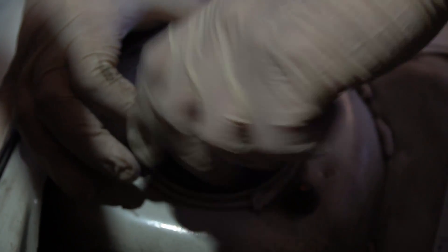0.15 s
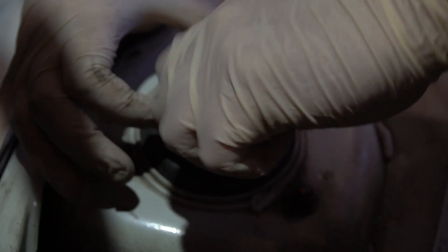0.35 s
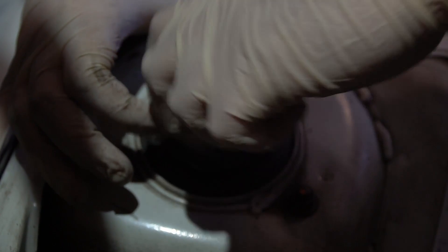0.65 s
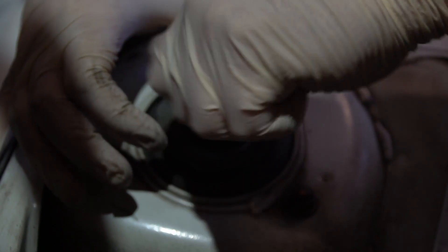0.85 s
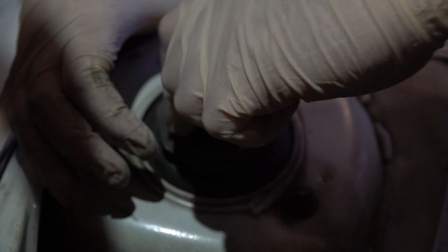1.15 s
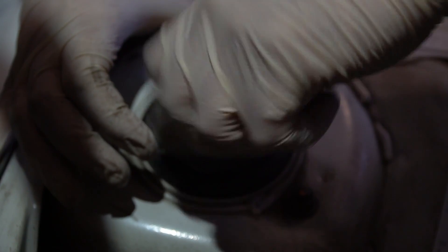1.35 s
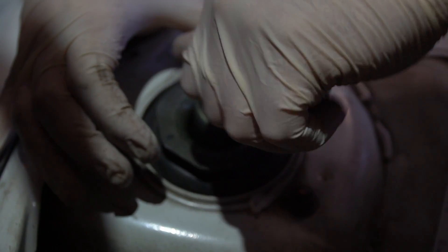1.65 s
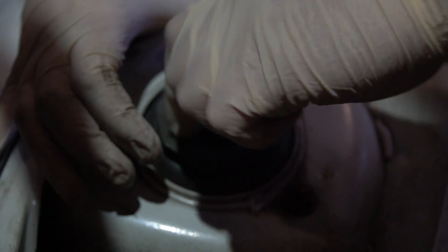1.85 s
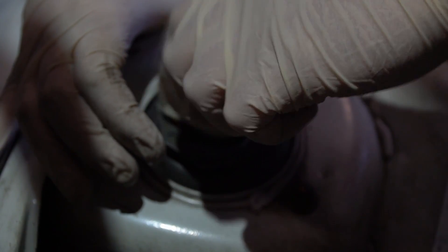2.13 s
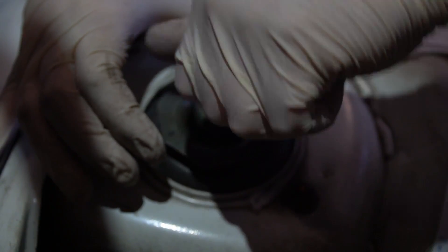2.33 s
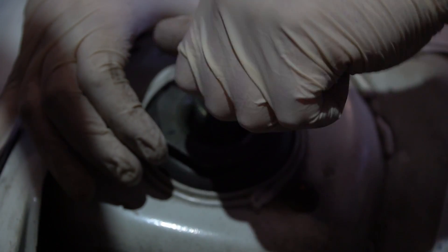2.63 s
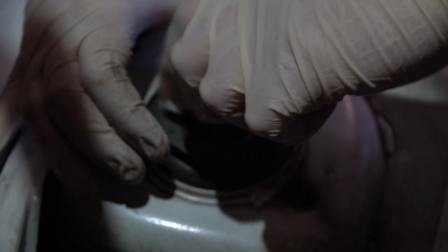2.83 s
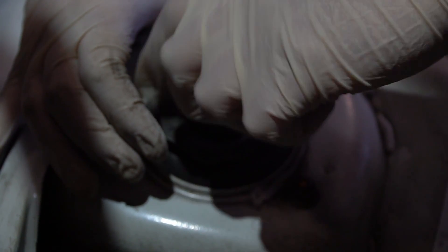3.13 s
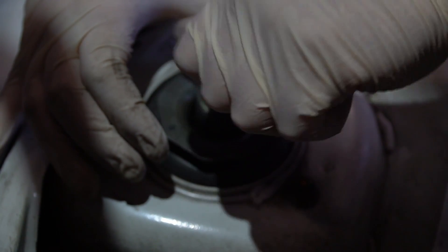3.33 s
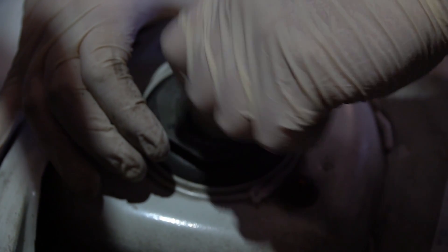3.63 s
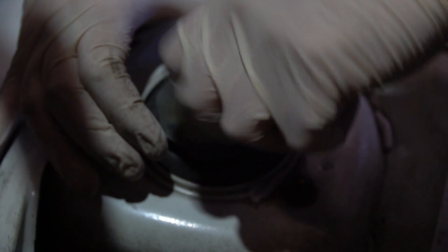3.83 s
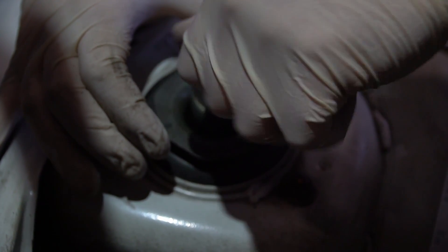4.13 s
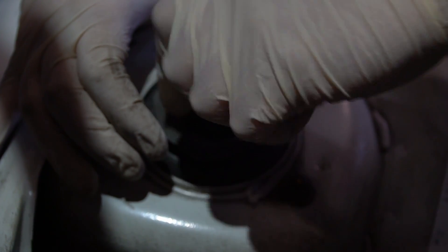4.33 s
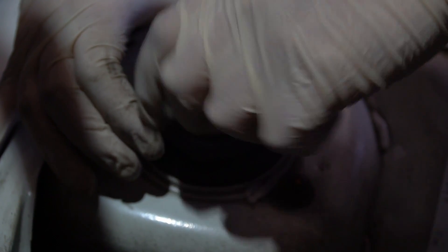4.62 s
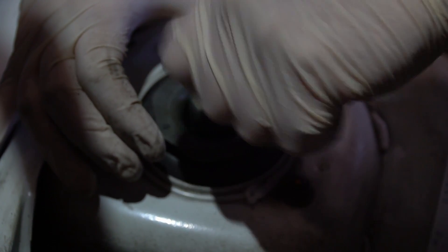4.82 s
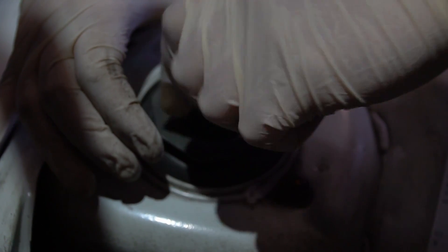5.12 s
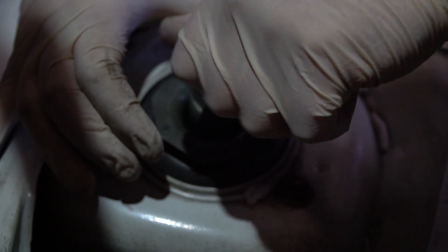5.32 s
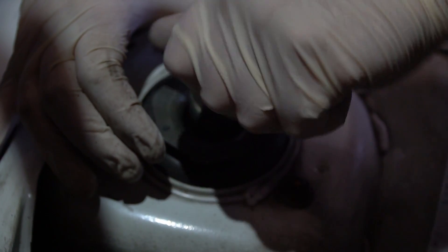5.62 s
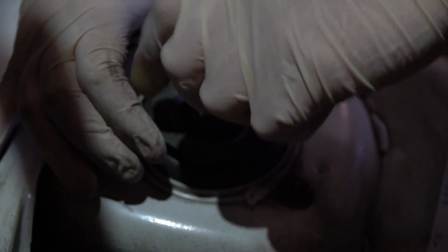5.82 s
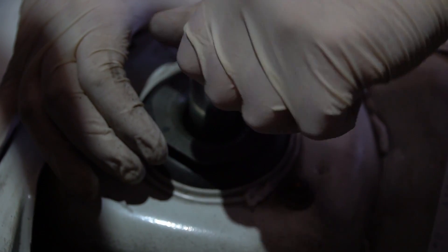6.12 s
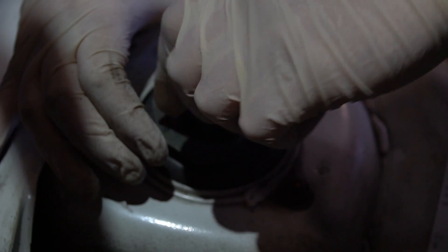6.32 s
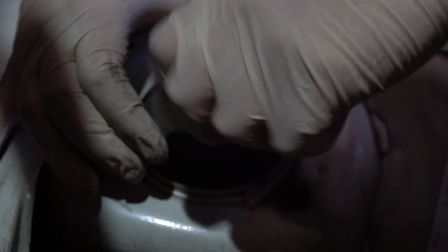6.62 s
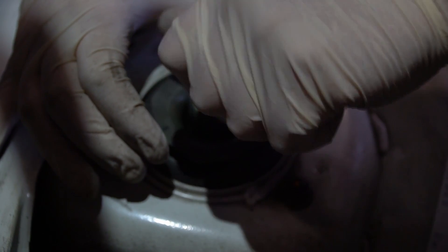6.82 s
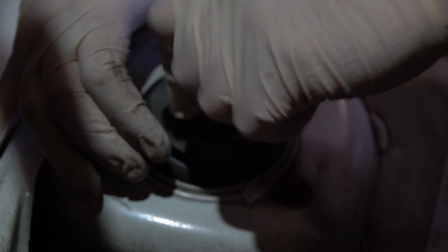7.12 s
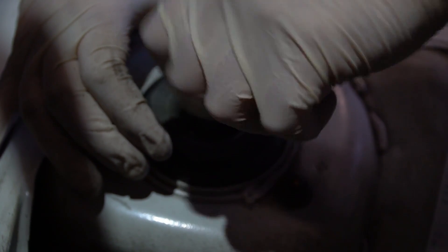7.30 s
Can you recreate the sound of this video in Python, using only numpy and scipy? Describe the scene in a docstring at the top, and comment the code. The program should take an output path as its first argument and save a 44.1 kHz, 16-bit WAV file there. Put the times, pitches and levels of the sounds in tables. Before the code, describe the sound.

Steady hand work in a garage, miked close in stereo: fingers slide and tick on a metal nut and plate, two or three small contacts a push, with short woody-low notes from the rod. The ring is brief and the room nearly dry. A muffled engine drones outside, rising, falling in pitch midway and rising again, with swelling low rumble and faint hiss.

```python
"""In a garage, a gloved hand spins a nut off a strut rod, a part turn at a time.
Each push is noise slips in the threads ringing the strut's low modes, with a faint rod tone and short low notes.
Fingers slide and tick on the metal: grains and noise bursts, coloured spot by spot, ring the nut and mount plate.
An engine hums beyond the walls, a few sine lines that climb, drop as if changing gear and climb again.
Shaped noise makes the garage's swelling rumble and soft hiss."""
import sys
import numpy as np
from scipy import signal
from scipy.fft import rfft, irfft
from scipy.io import wavfile
from scipy.ndimage import uniform_filter1d

SR = 44100
rng = np.random.default_rng(int(sys.argv[2]) if len(sys.argv) > 2 else 0)


def to_wav(s):
    """Save 16-bit WAV."""
    ch = np.atleast_2d(s).T  # columns
    pcm = np.round(np.clip(ch, -1, 1) * 32767)  # PCM
    wavfile.write(sys.argv[1], SR, pcm.astype(np.int16))


N = 328986

# Levels are those of each source before its own trim, the metal's ring, the room and the mix.
# Engine course: start_s, firing_hz, level_db (rms)
ENGINE_COURSE = [(0.0, 86.4, -29.5), (0.37, 87.4, -28.5), (0.65, 89.35, -32.5), (1.58, 91.7, -26),
                 (2.29, 93.5, -29), (2.41, 94.2, -34), (3.05, 95.7, -32), (3.09, 96, -36.5),
                 (3.6, 95.6, -34.5), (3.83, 90.5, -26.5), (4.09, 76.8, -41.5), (4.22, 74.6, -45),
                 (4.77, 75.6, -45.5), (5.63, 78.4, -37), (5.83, 78.8, -41), (7.35, 81.0, -36)]
# Weaker engine lines: multiple of the firing rate, before_db (rms before the gear change),
# after_db (level that the lines move 0.38 of the way towards)
CRANK_ORDERS = [(0.602, -54, -67), (1.2, -48.5, -47), (1.399, -62, -44), (1.598, -59, -48)]
# Spectrum of the garage background: freq_hz, density_db (per Hz, relative)
AIR_SPECTRUM = [(20, -21), (33, -3.5), (45, -5.5), (65, -1), (90, 5.5), (115, -1.5), (150, -1.5),
                (175, -11), (330, -15.5), (600, -19.5), (1500, -23), (4000, -29.5), (8000, -33),
                (16000, -43)]
# Left-right likeness of the background: freq_hz, likeness (0 to 1)
AIR_LIKENESS = [(100, 1), (250, 0.99), (500, 0.52), (2000, 0.49), (5000, 0.12), (16000, 0.13)]
# Swells of the distant rumble: time_s, gain_db
RUMBLE_SWELLS = [(0, -5), (1.5, 3.5), (3, -4), (4.5, 0.5), (6, -2.5), (7.4, 0)]
# Pushes of the hand on the nut: peak_s (hardest moment), build_up_s, run_out_s, force_db
PUSHES = [(0.455, .13, 0.11, -41), (0.88, 0.088, .12, -36.5), (1.31, 0.22, 0.09, -39),
          (1.59, 0.1, 0.07, -32.5), (1.93, .13, 0.1, -36.5), (2.24, 0.069, .16, -35.5),
          (2.495, 0.051, 0.12, -38.5), (2.875, 0.044, .1, -44.5), (3.13, .03, 0.059, -39),
          (3.235, 0.023, 0.084, -43), (3.339, 0.061, 0.068, -31.5), (3.485, .04, 0.077, -45.5),
          (3.715, 0.062, 0.09, -33.5), (4.06, 0.15, 0.21, -45), (4.436, 0.037, 0.082, -34.5),
          (4.87, 0.057, .06, -31.5), (4.925, .04, 0.094, -42), (5.19, 0.044, 0.058, -39.5),
          (5.25, .04, 0.1, -41), (5.61, 0.14, 0.18, -40.5), (5.96, 0.23, 0.063, -47),
          (6.05, 0.082, 0.11, -39), (6.13, 0.045, 0.1, -41), (6.46, .11, 0.077, -35),
          (6.615, 0.033, .07, -43), (6.795, .1, .12, -34.5), (6.985, .04, 0.051, -45.5),
          (7.12, .04, .14, -42), (7.29, 0.13, 0.12, -37)]
# Low modes of the strut: pitch_hz, width_hz, level_db (relative)
STRUT_MODES = [(212, 11.5, 3.5), (250, 62, -3), (305.3, 26, 4), (348.1, 16.2, 5.5), (386, 18, -9),
               (500.4, 11.6, -4), (542, 26, -10), (610, 60, -20), (735, 50, -23), (930, 110, -18.5)]
# Fingers sliding over the metal: middle_s, length_s, level_db, clank_db (up to 1.7 kHz), fizz_db (from 8.5 kHz);
# clank and fizz are relative to 2.6-4.3 kHz
FINGER_SLIDES = [(0.125, 0.066, -41.5, -0.5, -2), (0.259, 0.012, -39, -2, 0), (0.56, 0.046, -44.5, 1.5, -6),
                 (0.62, 0.036, -36.5, -3, -6.5), (0.676, 0.016, -30.5, 3, -3),
                 (0.882, 0.017, -35.5, -1.5, -6), (0.968, 0.025, -33, -5.5, -4),
                 (1.025, .035, -39.5, 1.5, -3.5), (1.069, 0.019, -28, 4, -4), (1.215, 0.021, -40, 1, -6),
                 (1.257, .02, -52, 10, -14), (1.31, 0.11, -45, -2, -4.5), (1.422, 0.033, -40, 6, 4.5),
                 (1.56, 0.049, -48, 5, -5), (1.646, 0.03, -37.5, -3.5, -2.5), (1.724, 0.043, -43, -1.5, 0),
                 (1.94, 0.08, -50, 0, -2), (2.024, 0.022, -38, -4, -4), (2.103, 0.039, -36.5, -2, -1.5),
                 (2.238, 0.017, -39.5, 1.5, -1.5), (2.356, 0.02, -35, -7, -5.5),
                 (2.439, 0.033, -35, -0.5, -5), (2.63, 0.12, -45, 2, -7), (2.693, 0.014, -33.5, -7.5, -6.5),
                 (2.772, 0.035, -38, 0.5, -0.5), (3.01, 0.098, -41, -3, -7),
                 (3.397, 0.053, -39, -3.5, -8.5), (3.519, 0.054, -40.5, 3, -1.5),
                 (3.704, 0.025, -39, 0, -5.5), (3.795, .018, -36, -5.5, -4), (3.843, 0.015, -39, -17, -3.5),
                 (3.886, 0.019, -35.5, -0.5, -2), (4.173, 0.023, -40, -4, -2),
                 (4.272, .036, -38.5, 1.5, -3.5), (4.535, .033, -36, -7, -5), (4.595, .025, -38.5, -0.5, 2),
                 (4.668, 0.018, -31, -5.5, -5), (4.84, 0.043, -46, 4, -3.5), (4.938, 0.036, -38.5, -13, -4),
                 (5.033, 0.028, -39.5, -1, -10), (5.072, 0.017, -33.5, 1, -2), (5.247, 0.013, -42, 5, -21),
                 (5.333, 0.021, -41.5, -4, -4.5), (5.395, .013, -46, 0, 6.5),
                 (5.653, 0.038, -41.5, -3, -14), (5.718, 0.027, -32, -5, -2), (5.769, 0.018, -41, 1, 2),
                 (5.83, 0.026, -42, 1.5, -3), (5.886, 0.0088, -50.5, 7, 13), (6.025, 0.022, -38, 1, -5),
                 (6.135, 0.048, -43, 1.5, -6), (6.286, 0.03, -33.5, 1, -5), (6.44, .04, -47, -2, -10),
                 (6.553, 0.027, -37, -7, -3.5), (6.619, 0.015, -37.5, -1, 0.5), (6.691, 0.031, -36, -2, -5),
                 (6.807, .039, -44.5, -2, -6), (6.912, 0.047, -38.5, -8, -7), (6.975, 0.014, -43, 0, 3),
                 (7.035, 0.0081, -37, -2, -5), (7.169, .025, -38.5, -4, -3), (7.244, 0.044, -43, -3, -2),
                 (7.307, 0.031, -36, 0, -8)]
# Short low notes of the strut: thread catches that make the rod judder, and one low hand bump at 7.098 s:
# start_s, length_s, pitch_hz, level_db (peak)
STRUT_NOTES = [(0.38, .028, 346, -42.5), (0.433, 0.047, 342, -37.5), (0.87, 0.056, 335, -49),
               (1.311, 0.035, 348, -42), (1.548, 0.068, 344, -35), (2.227, 0.0164, 355, -36),
               (2.482, .031, 352, -42), (3.315, 0.04, 332.5, -32.5), (3.699, 0.031, 291.6, -34),
               (4.415, 0.038, 337, -33.5), (4.841, .044, 334.3, -32), (5.241, 0.028, 349, -36.5),
               (5.623, .02, 323, -34.5), (6.029, 0.04, 343, -33.5), (6.113, .026, 353, -37.5),
               (6.312, .035, 339, -40.5), (6.447, 0.033, 338, -36), (6.778, .037, 342, -29),
               (7.098, .067, 152, -35), (7.223, 0.031, 330, -40.5), (7.282, 0.014, 353, -33.5)]
# Sharp ticks of nut and glove: start_s, decay_s, level_db (energy over 1 ms), clank_db, fizz_db (as for the slides)
NUT_TICKS = [(0.443, 0.0074, -33.5, -8, -2.5), (0.562, 0.0038, -29, -3, -2.5), (0.673, 0.0026, -34, -3, 3),
             (1.0618, .0024, -27.5, -3, 5.5), (1.0648, .0024, -19.5, 8, -1.5),
             (1.3396, 0.00076, -34.5, -5, 6), (1.634, 0.003, -19.5, -4, -8), (1.775, 0.0029, -36.5, 5, 5.5),
             (2.132, 0.0015, -30, 10.5, 5.5), (2.347, .002, -40, -7, 11.5), (2.4102, .001, -37, -6, 9),
             (2.591, 0.0044, -24, -10, -6.5), (2.6213, 0.0022, -31.5, -9, 9),
             (3.0572, 0.0033, -20.5, -3, -8), (3.119, 0.0042, -30, 6, 3), (3.305, 0.0085, -21.5, -6, -19),
             (3.423, .0023, -33, -7, 4.5), (3.481, .001, -29.5, -3, 6.5), (3.760, .001, -40, -3, 10),
             (4.036, 0.0022, -47, -5, 12.5), (4.096, 0.0012, -33.5, -9, 3), (4.113, 0.005, -29.5, -9, 7),
             (4.392, 0.0052, -24.5, 3.5, -2), (4.659, 0.0038, -23.5, -4, -2.5),
             (4.817, .005, -28.5, -3, -2), (4.9883, 0.0026, -31.5, -12, 1.5),
             (5.0644, 0.0039, -26.5, 3, -6), (5.205, 0.0035, -26.5, 2.5, -5), (5.564, 0.0024, -23, -12, 1),
             (5.574, 0.0039, -16.5, -5.5, -13.5), (5.9892, 0.0039, -34, 3, 5), (6.187, .002, -26.5, 0, 7),
             (6.197, 0.0044, -28.5, -2, 5), (6.4326, .005, -25.5, -8, 3), (6.479, 0.0028, -38, -4, 8),
             (6.547, .0011, -37, -6, 10), (6.785, 0.0028, -30, 2, 2), (7.211, 0.00099, -30, -8, 12),
             (7.257, .0007, -26.5, -13, 10), (7.3525, .002, -35.5, -2, 7.5)]
# Plain contact noise, before any ring: freq_hz, level_db
CONTACT_TONE = [(200, -17), (500, -14.5), (800, -6), (1500, -5), (2150, -8), (3300, -1.5), (4500, -3),
                (5200, -1.5), (7000, -1), (10000, -0.5), (13000, -2), (16000, -3)]
# Ring of the nut and the mount plate: pitch_hz, width_hz, level_db (over the plain contact noise)
PLATE_MODES = [(1002, 41, 8), (1276, 32, 10), (1858, 150, 9.5), (2387, 135, 9.5), (2690, 67, 5),
               (3104, 29, 9), (3370, 110, 4), (3826, 21, -12), (3965, 74, 7.5), (4380, 120, 3),
               (12500, 55, -16)]
# The hand's work at the right ear against the left: freq_hz, lag_rad, level_db
EAR_OFFSETS = [(199, 0, 1), (600, 0.43, 1), (1800, 0.32, 4), (2440, 0, 0.9), (5100, 1, 1.5), (9600, 1, 0.4),
               (16000, 0.44, 0)]


def amp(db):
    """Decibels to gain."""
    return 10 ** (np.asarray(db) / 20)


def unit(x):
    """Scales to rms 1."""
    return x / np.sqrt(np.mean(x ** 2) + 1e-20)


def read(points, hz):
    """Reads a table on a log-frequency axis."""
    f, value = np.transpose(points)
    return np.interp(np.log(hz + 1), np.log(f + 1), value)


def curve(rows, column=1):
    """One column of a timed table at every sample."""
    rows = np.array(rows)
    return np.interp(np.arange(N) / SR, rows[:, 0], rows[:, column])


def add(mix, s, sound):
    """Mixes a sound in at time s."""
    part = mix[..., max(round(s * SR), 0):][..., :sound.shape[-1]]
    part += sound[..., :part.shape[-1]]


def drift(hz):
    """Random wander of rms 1, low-passed around hz."""
    f = np.fft.rfftfreq(N, 1 / SR)
    noise = rfft(rng.standard_normal(N))
    return unit(irfft(noise / (1 + (f / hz) ** 4), N))


def causal(gain_db, size):
    """Minimum-phase impulse response, sharp at the start, for a gain given as a function of frequency."""
    log_gain = np.log(amp(gain_db(abs(np.fft.fftfreq(size, 1 / SR)))))
    spectrum = np.exp(np.conj(signal.hilbert(log_gain)))
    return np.fft.ifft(spectrum).real[:size // 2]


def peaks(modes, hz):
    """Power response of a set of resonances."""
    return sum(amp(db) ** 2 / (1 + ((hz ** 2 - f ** 2) / (width * hz + 1)) ** 2) for f, width, db in modes)


def slips(per_s, spread_db):
    """Friction: a random train of tiny slips, a few of them large."""
    size = amp(spread_db * np.minimum(rng.exponential(1, N), 4))
    sign = rng.choice([-1, 1], N)
    happens = rng.random(N) < per_s / SR
    return unit(size * sign * happens)


def touch(force, clank_db, fizz_db, ring_hz, ring_db=4, ring_share=0.087):
    """Clank and fizz set the tone of a contact; each spot of the metal favours its own band."""
    tone = [(1700, clank_db), (2600, 0), (4300, 0), (8500, fizz_db)]
    spot = [(ring_hz, ring_share * ring_hz, ring_db)]
    response = causal(lambda hz: read(tone, hz) + 10 * np.log10(0.85 + peaks(spot, hz)), size=512)
    return signal.fftconvolve(force, response)


def echoes(decay_s, shared):
    """Dense decaying reflections, partly common to the two ears, each ear of energy 1."""
    t = np.arange(int(7 * decay_s * SR)) / SR
    taps = rng.standard_normal((3, len(t))) * np.exp(-t / decay_s)
    share = np.clip(shared, 0, 1)
    pair = np.sqrt(share) * taps[0] + np.sqrt(1 - share) * taps[1:]
    return pair / np.linalg.norm(pair, axis=1, keepdims=True)


def scatter(sound, echo_db, decay_s=.0058, shared=0.11):
    """The close sheet metal throws a contact back, differently each time as the hand moves."""
    response = amp(echo_db) * echoes(decay_s, shared)
    response[:, 0] += 1  # direct sound
    return signal.fftconvolve(sound[None], response / np.linalg.norm(response[0]), axes=1)


def engine(level_db=0, waver_db=0.56, side_waver_db=2.5):
    """Only the firing note and a few weak crank orders come through the walls."""
    firing_hz = curve(ENGINE_COURSE) * (1 + 0.0029 * drift(6.5))
    phase = 2 * np.pi * np.cumsum(firing_hz) / SR
    out = amp(curve(ENGINE_COURSE, column=2) + level_db + waver_db * drift(6.4)) * np.sin(phase)
    # the gear change moves the lines 0.38 of the way from before_db towards after_db
    shifted = curve([(3.7, 0), (4.1, 0.38)])
    for multiple, before_db, after_db in CRANK_ORDERS:
        db = before_db + shifted * (after_db - before_db) + side_waver_db * drift(2.1)
        out += amp(db) * np.sin(multiple * phase + 0.51 * drift(2.17))
    return np.sqrt(2) * out  # rms levels to peaks


def air(level_db=-44.5, swell_db=1.25, rumble_hz=280):
    """Rumble and soft hiss as shaped noise, alike in both ears at the bottom and separate at the top."""
    hz = np.fft.rfftfreq(N, 1 / SR)
    a, b = rfft(rng.standard_normal((2, N)))
    same = np.clip(read(AIR_LIKENESS, hz), 0, 1)
    ears = np.array([a, same * a + np.sqrt(1 - same ** 2) * b])
    pair = unit(irfft(ears * amp(read(AIR_SPECTRUM, hz)), N))
    rumble = signal.sosfiltfilt(signal.butter(2, rumble_hz, fs=SR, output="sos"), pair)
    hiss = pair - rumble
    return amp(level_db + swell_db * drift(0.6)) * (hiss + amp(curve(RUMBLE_SWELLS)) * rumble)


def effort(ease_db=20.5, rest_db=-61.5):
    """Force on the threads in dB: each push gains ease_db in its build-up and loses it in its run-out."""
    t, power = np.arange(N) / SR, np.full(N, amp(rest_db) ** 2)
    for s, rise_s, fall_s, db in PUSHES:
        near = slice(*np.searchsorted(t, [s - 2 * rise_s, s + 2 * fall_s]))
        away = np.maximum((s - t[near]) / rise_s, (t[near] - s) / fall_s)
        power[near] += amp(db - ease_db * away) ** 2
    return 10 * np.log10(power)


def threads(level_db=-1, upper_db=-2.5, catch_db=-44.0, growth=1.0):
    """Stick-slip in the threads rings the strut; past the catching force only its upper modes grow."""
    ring = causal(lambda hz: 10 * np.log10(peaks(STRUT_MODES, hz) / (1 + (hz / 1300) ** 6) + 1e-10), size=8192)
    groan = signal.oaconvolve(slips(per_s=260, spread_db=0.5), ring)[:N]
    # even out the groan's random level, so that the pushes alone set its loudness
    groan /= np.sqrt(abs(uniform_filter1d(groan ** 2, size=1500)) + 1e-12)
    upper = signal.sosfiltfilt(signal.butter(3, 430, "highpass", fs=SR, output="sos"), groan)
    lower = groan - upper
    force_db = effort()
    excess_db = np.maximum(force_db - catch_db, 0)
    capped = amp(force_db - excess_db + level_db)
    return capped * (lower + amp(upper_db + growth * excess_db) * upper)


def rod_tone(hz=344, level_db=-4, limit_db=-44, unsteady_db=2.5, bend=0.025):
    """Even a light push draws a faint, halting tone from the rod's main mode."""
    phase = 2 * np.pi * np.cumsum(hz * (1 + bend * drift(40))) / SR
    force_db = np.minimum(effort(), limit_db)
    return amp(force_db + level_db + unsteady_db * drift(24)) * np.sin(phase)


def rustle(level_db=-59, follow=0.42, firm_db=-50):
    """The glove creases and crackles faintly, more so while it grips and turns."""
    grip_db = follow * (effort() - firm_db)
    crease_db = 3 * drift(22)
    force = amp(level_db + grip_db + crease_db) * slips(per_s=400, spread_db=5.5)
    return scatter(touch(force, clank_db=5.5, fizz_db=1, ring_hz=3720), echo_db=5.5)[:, :N]


def brushes(clank_db=2.5, fizz_db=1.9, count=120, gap_s=0.06, length_s=0.017, level_db=-54.5, spread_db=1.2):
    """Faint finger brushes at uneven intervals, as rows like those of FINGER_SLIDES."""
    rows = []
    for k, (late, longer, louder) in enumerate(rng.standard_normal((count, 3))):
        s = (k + late / 2) * gap_s
        if 0 < s < N / SR:
            rows.append((s, length_s * 2 ** (longer / 2), level_db + spread_db * louder, clank_db, fizz_db))
    return rows


def scrapes(rows, level_db=0, echo_db=3, ring_db=2, catch_db=1.7, catch_hz=90):
    """Slips swell and fade under each slide; the more it clanks, the lower the band it favours."""
    center_hz, spot_octaves, clank_db_per_octave = 2690, 0.16, 18  # spot_octaves: spread from spot to spot
    grains = slips(per_s=2600, spread_db=3.7) * amp(catch_db * drift(catch_hz))
    out = np.zeros((2, N))
    for s, length, db, clank_db, fizz_db in rows:
        at = np.arange(max(int((s - 2 * length) * SR), 0), min(int((s + 2 * length) * SR), N))
        pressure = np.exp(-2 * ((at / SR - s) / length) ** 2)
        force = unit(grains[at] * pressure) * np.sqrt(np.mean(pressure ** 2))
        octaves = spot_octaves * rng.standard_normal() - clank_db / clank_db_per_octave
        slide = touch(force, clank_db, fizz_db, center_hz * 2 ** octaves, ring_db=ring_db)
        add(out, at[0] / SR, amp(db + level_db) * scatter(slide, echo_db))
    return out


def strut_notes(level_db=0.4, octave_db=-20):
    """Fluttering sines with a faint octave: the rod judders as the thread catches, and one low hand bump."""
    bend, flutter = 1 + .03 * drift(110), amp(1.6 * drift(130))
    out = np.zeros(N)
    for s, length, hz, db in STRUT_NOTES:
        at = round(s * SR) + np.arange(round(length * SR))
        phase = 2 * np.pi * np.cumsum(hz * bend[at]) / SR
        note = np.sin(phase) + amp(octave_db) * np.sin(2 * phase)
        add(out, s, amp(db + level_db) * note * flutter[at] * signal.windows.tukey(len(at), .3))
    return out


def clicks(level_db=0, echo_db=1, creep_db=-21, creep_s=0.0095, ring_db=6, ring_growth=0.19):
    """The contact creeps, then lets go in a brief rattle; harder spots fizz more and ring higher."""
    center_hz, low_hz, high_hz, fizz_db_per_octave = 6400, 2390, 13100, 9
    out, t = np.zeros((2, N)), np.arange(-512, 768) / SR
    for s, decay_s, db, clank_db, fizz_db in NUT_TICKS:
        creep = amp(creep_db) * np.exp(-abs(t) / creep_s)
        rattle = np.exp(-abs(t) / decay_s)
        force = rng.standard_normal(len(t)) * np.where(t < 0, creep, rattle)
        force *= np.sqrt(SR / 1000 / np.sum(force ** 2))  # energy of 1 ms at rms 1
        ring_hz = np.clip(center_hz * 2 ** (fizz_db / fizz_db_per_octave), low_hz, high_hz)
        tick = touch(force, clank_db, fizz_db, ring_hz, ring_db=ring_db + ring_growth * fizz_db)
        add(out, s + t[0], amp(db + level_db) * scatter(tick, echo_db))
    return out


def plate(force):
    """The nut and its mount plate ring under every contact."""
    ring = causal(lambda hz: read(CONTACT_TONE, hz) + 10 * np.log10(1 + peaks(PLATE_MODES, hz)), size=8192)
    return signal.oaconvolve(force, ring[None], axes=1)[:, :N]


def garage(pair, wet_db, decay_s=.05):
    """A weak tail of dense reflections from the room."""
    return pair + amp(wet_db) * signal.oaconvolve(pair, echoes(decay_s, shared=0.81), axes=1)[:, :N]


def ports(pair):
    """Two microphone ports side by side hear a near source with different delay and level."""
    hz, table = np.fft.rfftfreq(N, 1 / SR), np.array(EAR_OFFSETS)
    lag_rad, level_db = read(table[:, :2], hz), read(table[:, ::2], hz)
    half = np.exp(-.5j * lag_rad) * amp(level_db / 2)  # each side takes half of the offset
    return irfft(rfft(pair) * np.array([1 / half, half]), N)


def scene(contact_db=2):
    """The hand's work close by, over the hum and the air."""
    hum = engine() + air()
    strut = (threads() + rod_tone() + strut_notes()) * np.ones((2, 1))
    contacts = amp(contact_db) * plate(rustle() + scrapes(brushes()) + scrapes(FINGER_SLIDES) + clicks())
    work = garage(contacts, wet_db=-14.5) + garage(strut, wet_db=-17.5, decay_s=.035)
    return ports(work) + hum


def record(dry, edge_hz=16000):
    """Band limit: a steep linear-phase low-pass."""
    return signal.oaconvolve(dry, signal.firwin(401, edge_hz, window=("kaiser", 8), fs=SR)[None], "same")


dry = scene()
out = record(dry)
to_wav(out)
```